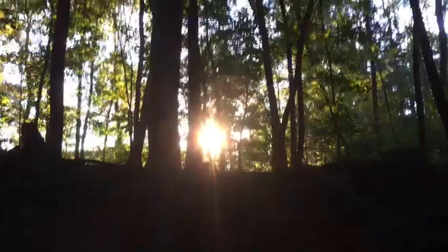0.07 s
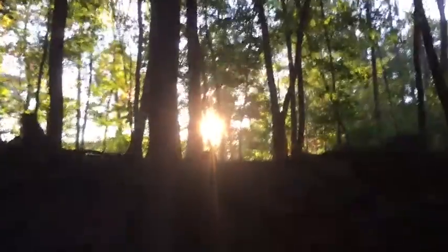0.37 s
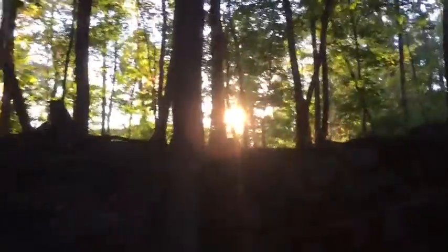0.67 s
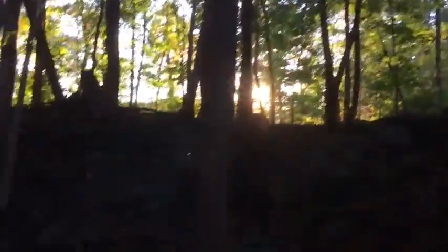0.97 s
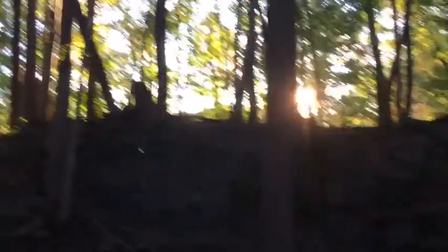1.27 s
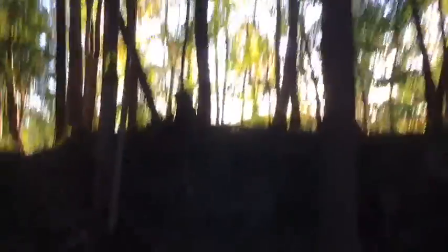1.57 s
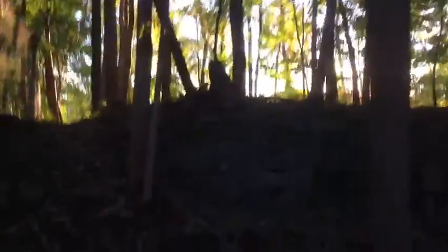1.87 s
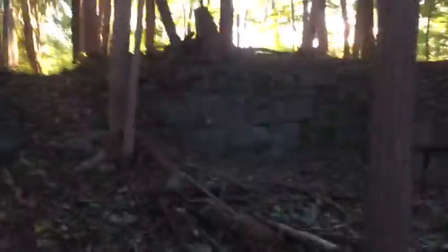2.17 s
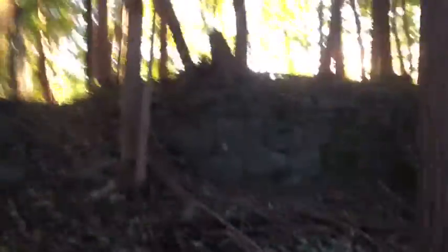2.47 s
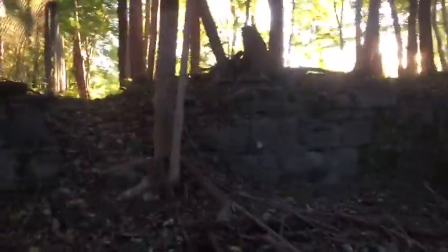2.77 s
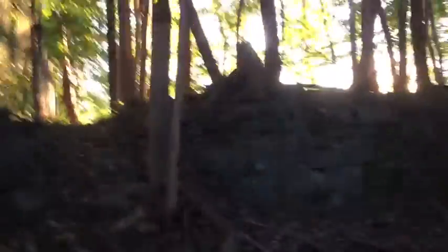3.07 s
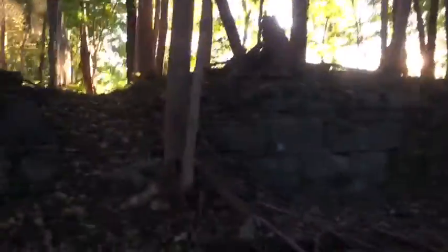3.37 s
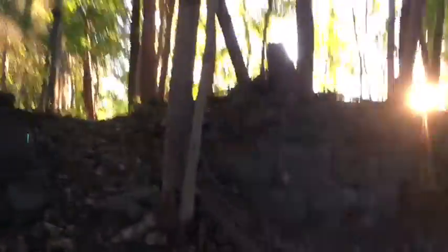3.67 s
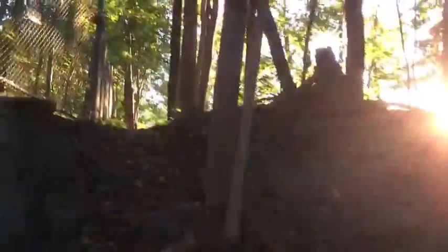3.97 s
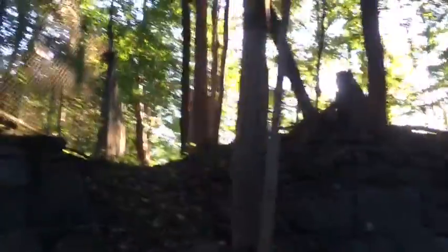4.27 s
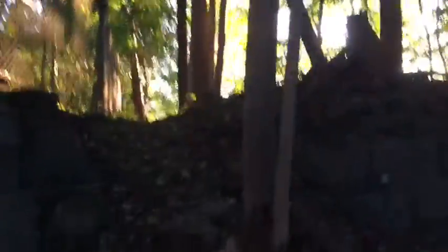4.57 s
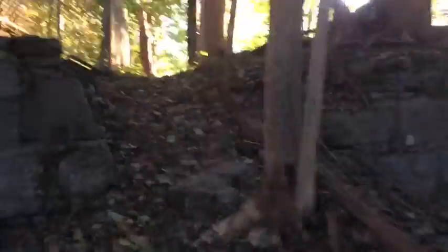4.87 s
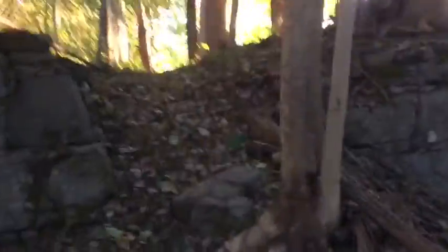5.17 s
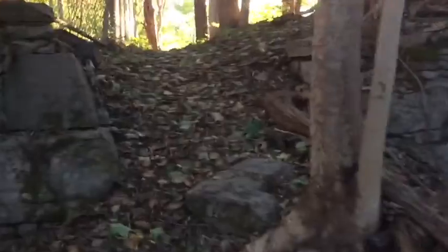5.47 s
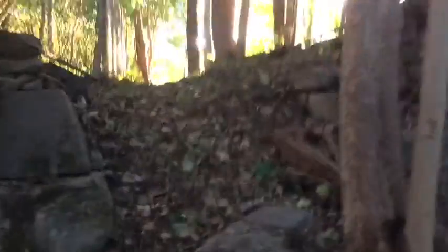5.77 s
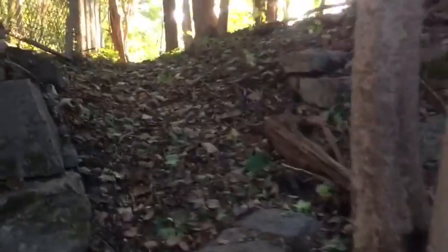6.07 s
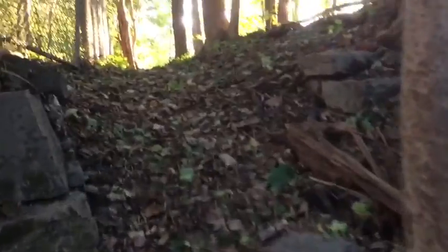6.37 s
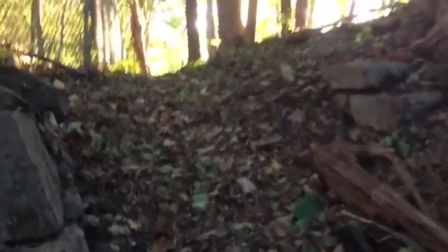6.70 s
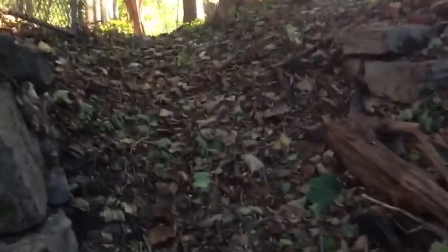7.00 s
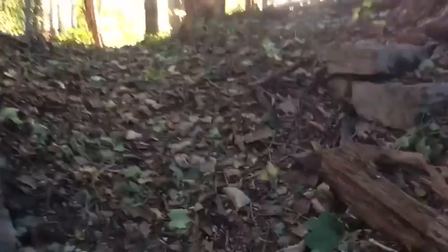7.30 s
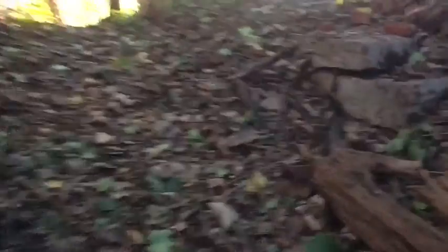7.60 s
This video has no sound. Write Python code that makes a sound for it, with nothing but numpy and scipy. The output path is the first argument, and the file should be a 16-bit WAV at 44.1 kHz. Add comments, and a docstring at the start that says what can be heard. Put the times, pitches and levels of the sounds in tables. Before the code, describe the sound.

Slow, uneven footsteps crush dry fallen leaves in a wood. Each step is a short, crisp crunch, and between steps the leaves swish, scrape and tick. A few sticks give dull little knocks underfoot. About three quarters of the way through, a twig snaps sharply, the loudest sound, and the walking goes on. A faint low rumble and far hiss stay underneath. It is all heard close, in mono, from the walker's phone.

```python
"""Slow footsteps crush dry fallen leaves in a wood, each step a burst of tiny breaks.
Between steps the leaves swish, scrape and tick; sticks knock underfoot and one twig snaps close by.
The leaf sounds are made of many random clicks, while the sticks and the twig ring with short tones.
A steady low rumble and a far hiss fill the wood. The walker's phone hears it all in mono."""
import sys
import numpy as np
from scipy import signal
from scipy.fft import rfft, irfft
from scipy.io import wavfile
from scipy.ndimage import uniform_filter1d

SR = 44100
rng = np.random.default_rng(int(sys.argv[2]) if len(sys.argv) > 2 else 0)


def master_out(mix):
    """Clip the mix to full scale and print it as 16-bit PCM to the path in sys.argv[1]."""
    frames = np.transpose(np.atleast_2d(mix))
    ceiling = np.clip(frames, -1, 1)
    pcm = np.round(ceiling * 32767).astype(np.int16)
    wavfile.write(sys.argv[1], SR, pcm)


N = 341334
T = np.arange(N) / SR  # time of each sample [s]


def undb(db):
    """Turn decibels into a factor to multiply by."""
    return 10 ** (np.asarray(db) / 20)


def unit(x):
    """Scale a signal to an average power of 1."""
    return x / np.sqrt(np.mean(x ** 2) + 1e-18)


def colour(x, spectrum):
    """Shape the tone with (frequency [Hz], level [dB]) points; white noise keeps its power."""
    hz, db = np.transpose(spectrum)
    size = 8192
    log_hz = np.log(np.fft.rfftfreq(size, 1 / SR) + 1)
    log_gain = np.log(undb(np.interp(log_hz, np.log(hz), db)))
    # fold the filter so that it rings only after a click, never before
    cepstrum = irfft(log_gain)
    cepstrum[1:size // 2] *= 2
    cepstrum[size // 2 + 1:] = 0
    response = irfft(np.exp(rfft(cepstrum)))
    return signal.fftconvolve(x, response / np.linalg.norm(response))[:len(x)]


def band(x, hz, width_hz):
    """Keep one band, as a ringing leaf does; white noise keeps about the same power."""
    edges = np.clip([hz - width_hz / 2, hz + width_hz / 2], 100, SR / 2 - 100)
    bandpass = signal.butter(2, edges, "band", fs=SR, output="sos")
    return signal.sosfilt(bandpass, x) * np.sqrt(SR / 2 / width_hz)


def notch(x, hz, q, depth):
    """Turn down one frequency by a depth from 0 to 1; a higher q makes the dip narrower."""
    notched = signal.lfilter(*signal.iirnotch(hz, q, SR), x)
    return x + depth * (notched - x)


def drift(turns_per_s):
    """A smooth random wobble with a size near 1."""
    hold = int(SR / turns_per_s)
    held = rng.standard_normal(4096)[np.arange(N) // hold % 4096]
    return unit(uniform_filter1d(uniform_filter1d(held, hold), hold))


def clicks(per_s, spread_db):
    """Tiny breaks or touches at random moments; spread_db sets how much their strengths vary."""
    happens = rng.random(N) < per_s / SR
    size = np.minimum(rng.exponential(size=N), 4)
    return unit(happens * rng.choice([-1, 1], N) * undb(spread_db * size))


def fade(start, t60):
    """Start suddenly, then die away by 60 dB every t60 seconds."""
    age = T - start
    return (age >= 0) * np.exp(-np.log(1000) * np.maximum(age, 0) / t60)


def press(start, length, rise, release):
    """A foot's pressure builds, holds and lets go; rise and release are shares of the length."""
    hold = max(1 - rise - release / 2, 0.05)
    times = start + length * np.cumsum([0, rise, hold, release])
    return np.interp(T, times, [0.0076, 0.99, 0.83, 0.0003])


def stir(peak_s, build_s, settle_db_per_s):
    """Swept leaves move more as the foot speeds up, then settle."""
    growth = np.clip(1 + (T - peak_s) / build_s, 0, 1)
    return growth * undb(-settle_db_per_s * np.maximum(T - peak_s, 0))


def wood(hiss_db=-50):
    """A distant rumble drifts slightly in level under an even, far hiss."""
    # tone of the rumble and of the hiss: (frequency [Hz], relative level [dB])
    rumble_tone = [(20, -31), (31, -27), (43, 0), (52, -0.5), (68, -2.5), (84, 2), (105, -3.5), (150, -8.5),
                   (240, -10), (330, -21.5), (500, -43)]
    hiss_tone = [(180, -26), (300, -2), (511, -5.5), (645, -4), (1150, -4.5), (1320, -6), (1430, -6),
                 (3030, -7), (4910, -15.5), (6200, -14), (7570, -22), (8220, -21.5), (16000, -47)]
    # loudness of the rumble: (time [s], level [dB])
    rumble_levels = [(0.8, -45.5), (3.3, -46.5), (6.1, -45.3), (7.0, -43.8)]
    rumble_gain = undb(np.interp(T, *np.transpose(rumble_levels)))
    rumble = colour(rng.standard_normal(N), rumble_tone) * rumble_gain
    hiss = colour(rng.standard_normal(N), hiss_tone) * undb(hiss_db)
    return rumble + hiss


def stalk_ticks(build_s=0.014, t60=0.042, strays_per_s=1.5, stray_db=-59):
    """A dry stalk gives way fibre by fibre, then splits in a short run of thin clicks."""
    # stalks that split: (time [s], level [dB])
    splits = [(2.7302, -52), (3.3894, -55), (3.4406, -54), (3.5009, -55), (5.4126, -50), (6.114, -49),
              (6.1409, -45), (6.8818, -54), (6.9177, -40.5), (7.3652, -46.5), (7.4294, -53), (7.6695, -44)]
    # tone of a stalk: (frequency [Hz], relative level [dB])
    stalk_tone = [(3000, -30), (7500, -17), (9700, -3), (10500, 5), (11100, -4), (11900, -2), (13200, -1),
                  (14000, -3), (16000, -2.5)]
    strays = [(time, stray_db) for time in T[rng.random(N) < strays_per_s / SR]]
    strain = np.zeros(N)
    for time, db in splits + strays:
        bending = (T < time) * np.clip(1 + (T - time) / build_s, 0, 1) ** 2
        strain += undb(db) * (bending + fade(time, t60))
    return colour(strain * clicks(per_s=2200, spread_db=4.0), stalk_tone)


def leaf_scrapes():
    """Leaves dragged by the sole catch and slip on each other, hissing in one band per drag."""
    # drags: (start [s], length [s], level [dB], band centre [Hz], band width [Hz])
    drags = [(4.405, .04, -53, 14500, 2400), (4.42, 0.16, -55, 10600, 1300), (4.42, 0.52, -58, 14600, 2600),
             (4.948, 0.29, -54, 10500, 1700), (6.387, .17, -50, 2540, 1500), (6.39, .11, -54, 6000, 1200),
             (6.46, .02, -46, 2900, 1400)]
    slips = clicks(per_s=14000, spread_db=6.0)
    return sum(band(slips * undb(db) * press(start, length, rise=0.25, release=0.5), hz, width)
               for start, length, db, hz, width in drags)


def leaf_rustle(swish_settle_db_per_s=20.5, sizzle_settle_db_per_s=42):
    """Leaves slide over each other in countless tiny touches: a swish with a finer sizzle on top."""
    # sweeps of a foot: (fastest moment [s], build-up [s], swish level [dB], sizzle level [dB])
    sweeps = [(0.2, .1, -69, -79), (0.76, 0.14, -58.5, -63), (0.98, 0.14, -52, -56),
              (1.31, 0.079, -52, -58), (1.75, 0.38, -55, -62.5), (2.1, .2, -57.5, -80),
              (2.41, 0.25, -53, -57), (3.07, 0.17, -51.5, -51.5), (3.75, .17, -55, -60),
              (4.0, 0.1, -52.5, -58.5), (4.42, 0.32, -51.5, -55.5), (4.71, 0.16, -52, -51),
              (5.1, 0.24, -53, -54.5), (5.43, .04, -55, -60.5), (5.81, 0.3, -49.5, -50),
              (6.44, 0.11, -53, -58), (6.68, 0.13, -60, -65), (7.28, .16, -54, -58), (7.69, .05, -64, -64)]
    # tone of the swish and of the sizzle: (frequency [Hz], relative level [dB])
    swish_tone = [(500, -38), (1500, -3), (3000, -5), (4000, -2.5), (4900, -1.5), (6100, 1), (7500, -2),
                  (9300, -1.5), (10200, -10), (12000, -12), (16000, -28)]
    sizzle_tone = [(6000, -35), (9000, 2.5), (10300, 1), (11300, 3), (12800, -2.5), (14500, -3),
                   (16000, -16)]
    swish_power, sizzle_power = np.zeros((2, N))
    for peak_s, build_s, swish_db, sizzle_db in sweeps:
        swish_power += (undb(swish_db) * stir(peak_s, build_s, swish_settle_db_per_s)) ** 2
        sizzle_power += (undb(sizzle_db) * stir(peak_s, build_s, sizzle_settle_db_per_s)) ** 2
    flutter = undb(0.5 * drift(turns_per_s=45))
    swish = np.sqrt(swish_power) * flutter * clicks(per_s=18000, spread_db=3.0)
    sizzle = np.sqrt(sizzle_power) * flutter * clicks(per_s=12000, spread_db=4.5)
    return colour(swish, swish_tone) + colour(sizzle, sizzle_tone)


def leaf_cracks(t60=0.0088, width_share=0.69):
    """A stiff leaf buckles in a few milliseconds of breaks that make it ring."""
    # leaves that buckle: (time [s], level [dB], pitch [Hz])
    buckles = [(1.2915, -34.5, 4200), (1.334, -38, 3200), (2.316, -35, 2900), (2.9672, -33.5, 5700),
               (3.056, -37, 6000), (3.630, -36, 3800), (4.2595, -34.5, 2100), (4.2625, -32, 3800),
               (4.991, -40, 5700), (5.126, -40.5, 6500), (5.631, -35, 5500), (7.138, -34.5, 2800),
               (7.213, -39, 5000)]
    breaks = clicks(per_s=25000, spread_db=3.5)
    return sum(band(breaks * undb(db) * fade(time, t60), hz, hz * width_share)
               for time, db, hz in buckles)


def stick_knocks(swell_cycles=0.98):
    """A stick or stone knocked by the sole swings only a few times in the soft ground."""
    # knocks: (time [s], peak level [dB], pitch [Hz])
    hits = [(2.340, -27.5, 950), (2.346, -30, 900), (3.4585, -36, 620), (4.276, -31.5, 780),
            (4.648, -35, 1000), (4.712, -39, 900), (4.8158, -23, 980), (5.823, -38, 600)]
    sound = np.zeros(N)
    for time, db, hz in hits:
        cycles = np.arange(SR // 50) * hz / SR
        progress = cycles / swell_cycles
        swell = (progress * np.exp(1 - progress)) ** 3
        swing = -np.cos(2 * np.pi * cycles)
        sound[int(time * SR):][:len(cycles)] += undb(db) * swell * swing
    return sound


def twig_snap(snap_s=5.7841, ring_gain_db=-7.0):
    """The twig breaks and rings briefly; splinters follow, and ground and trunks scatter the crack."""
    # tones of the bending twig: (pitch [Hz], relative level [dB], time to fade by 60 dB [s])
    twig_tones = [(240, -14.5, 0.028), (660, -9, 0.01), (960, -11, 0.022), (1250, -15.5, 0.027),
                  (1680, -17.5, 0.018), (2566, -13, 0.016), (3760, -8, 0.012), (4520, -9.5, 0.013),
                  (5370, -11, 0.0086), (6260, -14.5, 0.01), (7140, -2.5, 0.0059), (8330, 0.5, 0.0056),
                  (10300, -1, 0.0026), (11500, -5, 0.0046), (12600, -3, .004), (15000, 1, .003)]
    # tone of the splinters and echoes: (frequency [Hz], relative level [dB])
    scatter_tone = [(150, -11), (600, -3), (2000, -11), (5000, -6), (8400, -2), (10300, -4), (11800, 3),
                    (13500, -5), (16000, -12)]
    age = np.arange(SR // 10) / SR
    ring = np.zeros(N)
    for k, (hz, db, t60) in enumerate(twig_tones):
        swing = (-1) ** k * np.sin(2 * np.pi * hz * age)  # neighbouring tones swing opposite ways
        decay = np.exp(-np.log(1000) * age / t60)
        ring[int(snap_s * SR):][:len(age)] += undb(db + ring_gain_db) * swing * decay
    splinters = undb(-18) * fade(snap_s, t60=0.026)
    echo = undb(-30) * fade(snap_s + 0.011, t60=0.027)
    near_scatter = undb(-33) * fade(snap_s, t60=0.11)
    far_scatter = undb(-41) * fade(snap_s, t60=0.55)
    tail = (splinters + echo + near_scatter + far_scatter) * clicks(per_s=16000, spread_db=-0.5)
    return ring + colour(tail, scatter_tone)


def footsteps(jerk_db=1.5, soil_lag_s=0.006):
    """Each step crackles the top leaves, crunches the packed layer below and scrapes the soil."""
    # steps: (start [s], length [s], crunch level [dB], crackle level [dB], soil level [dB])
    steps = [(1.27, 0.08, -52.5, -53, -66), (1.784, .04, -49, -59, -59), (2.306, 0.057, -41.5, -46, -48.5),
             (2.944, 0.054, -47, -47.5, -50.5), (2.988, 0.24, -50.5, -52, -55),
             (3.579, 0.082, -47.5, -49, -50.5), (4.265, 0.038, -44.5, -46.5, -46.5),
             (4.628, 0.2, -53.5, -62, -59), (5.611, 0.076, -48, -43, -59), (7.109, 0.11, -44.5, -40, -51)]
    # tone of packed leaves, top leaves and soil: (frequency [Hz], relative level [dB])
    crunch_tone = [(200, -9), (600, -8.5), (1200, 4.5), (2000, 4), (2900, 3.5), (4000, -6.5), (4900, -3),
                   (6200, -1), (10000, -28), (16000, -24)]
    crackle_tone = [(1000, -24), (3000, 4), (4900, 3.5), (6200, 3.5), (9000, 4.5), (10400, 3), (12000, 2),
                    (16000, -2)]
    soil_tone = [(80, -14), (250, -1), (500, -6.5), (850, 3.5), (1400, -3), (2500, -16), (6000, -51)]
    pressures = np.array([press(start, length, rise=0.23, release=0.61) for start, length, *_ in steps])
    layer_gains = undb(np.array(steps)[:, 2:])
    layer_forces = layer_gains.T @ pressures  # add up all the steps for each layer
    # each layer gives way in jerks of its own
    crunch, crackle, soil = (force * undb(jerk_db * drift(turns_per_s=220)) for force in layer_forces)
    soil = np.interp(T - soil_lag_s, T, soil)  # the sole reaches the soil just after the leaves
    return (colour(crunch * clicks(per_s=5000, spread_db=3.5), crunch_tone)
            + colour(crackle * clicks(per_s=6500, spread_db=4.0), crackle_tone)
            + colour(soil * clicks(per_s=3000, spread_db=2.0), soil_tone))


def scene():
    """All the sounds meet at one microphone, so both channels are the same."""
    mono = (wood() + leaf_rustle() + footsteps() + leaf_scrapes() + leaf_cracks()
            + stalk_ticks() + stick_knocks() + twig_snap())
    return np.array([mono, mono])


def record(dry, top_hz=16000):
    """The phone's microphone hole dips two frequencies; the phone fades in, clips and cuts the top."""
    dipped = notch(dry, hz=4890, q=18.0, depth=0.34)
    dipped = notch(dipped, hz=10460, q=25.0, depth=0.27)
    fade_in = np.interp(T, [0.11, 0.18], [0, 1]) ** 2
    clipped = np.clip(dipped * fade_in, -1, 1)
    lowpass = signal.ellip(10, 0.2, 80, top_hz, fs=SR, output="sos")
    return signal.sosfilt(lowpass, clipped)


dry = scene()
out = record(dry)
master_out(out)
```